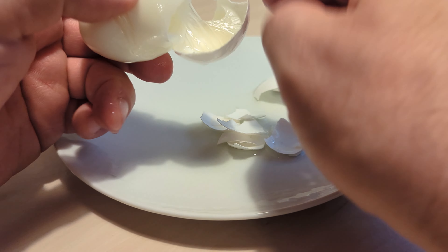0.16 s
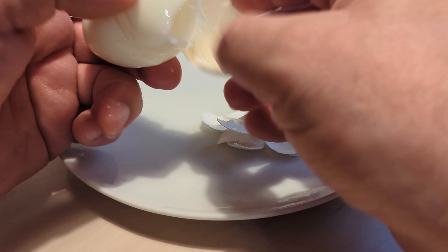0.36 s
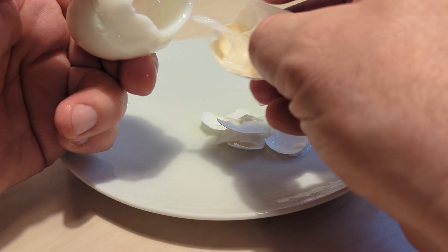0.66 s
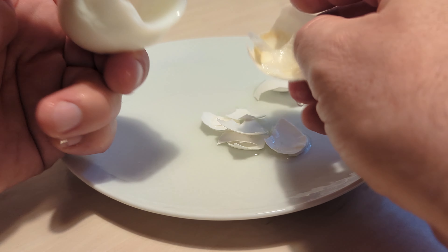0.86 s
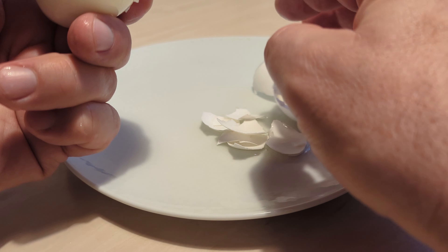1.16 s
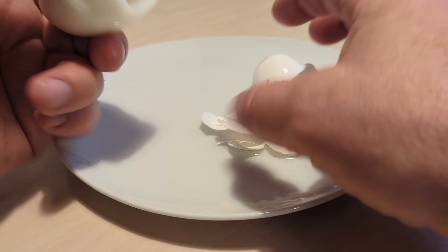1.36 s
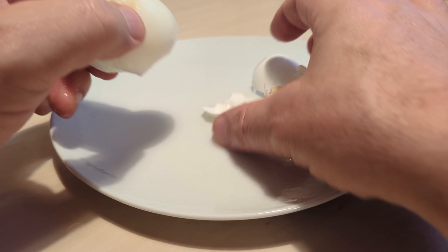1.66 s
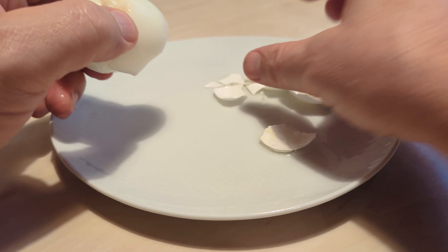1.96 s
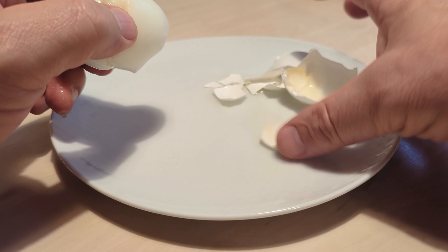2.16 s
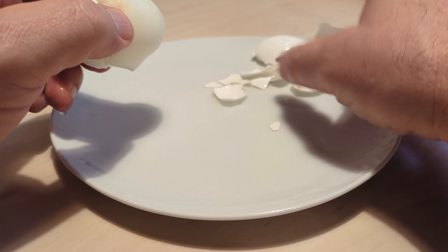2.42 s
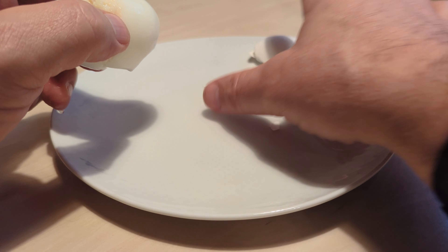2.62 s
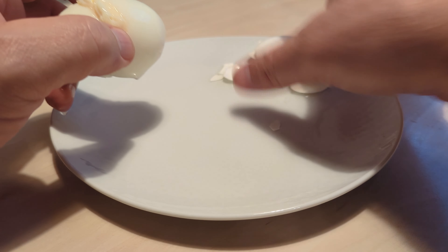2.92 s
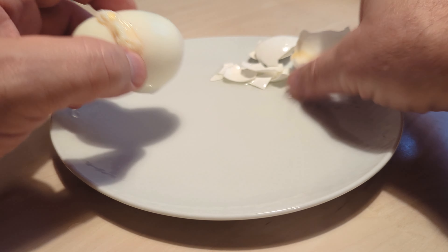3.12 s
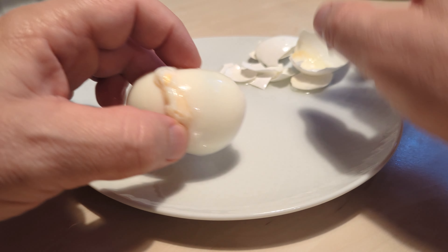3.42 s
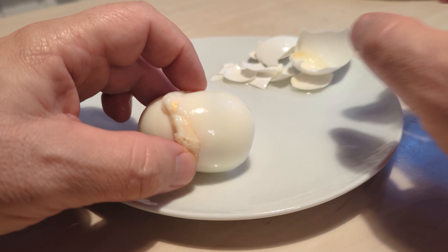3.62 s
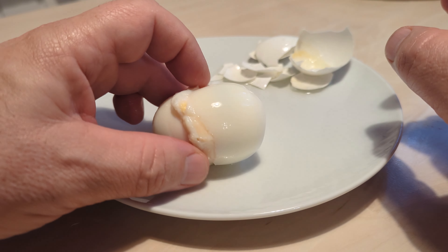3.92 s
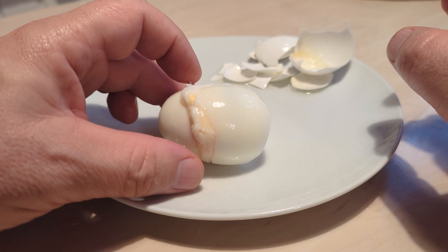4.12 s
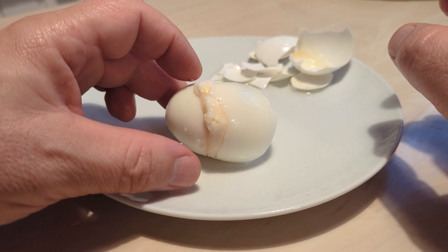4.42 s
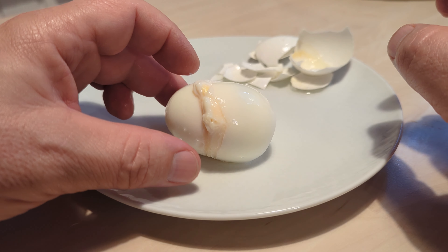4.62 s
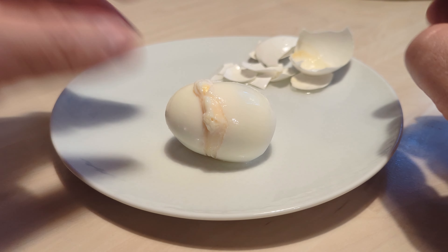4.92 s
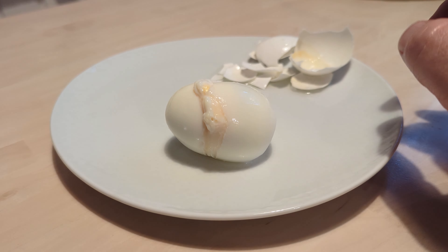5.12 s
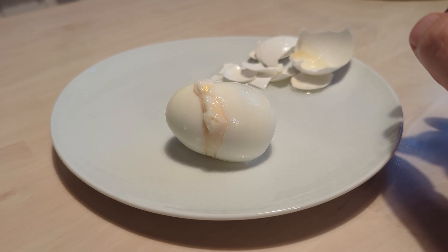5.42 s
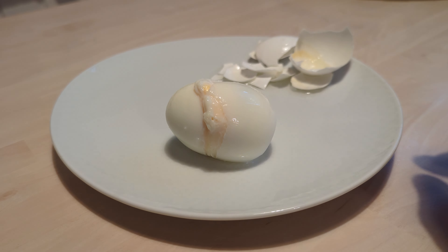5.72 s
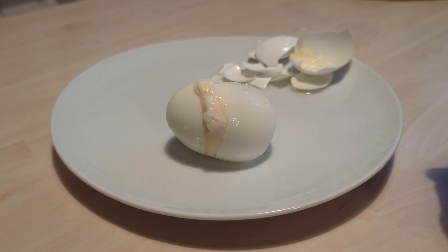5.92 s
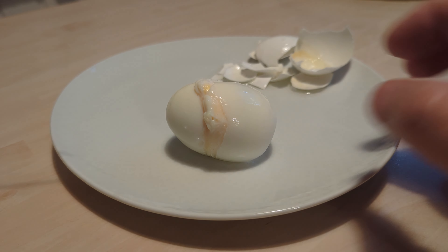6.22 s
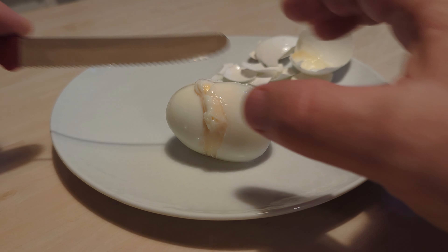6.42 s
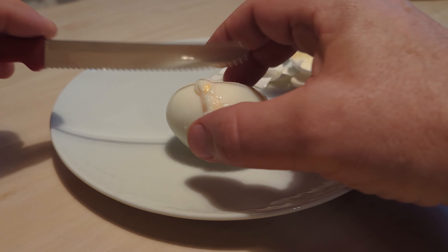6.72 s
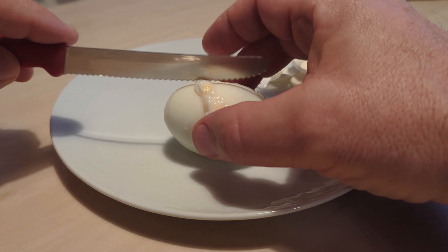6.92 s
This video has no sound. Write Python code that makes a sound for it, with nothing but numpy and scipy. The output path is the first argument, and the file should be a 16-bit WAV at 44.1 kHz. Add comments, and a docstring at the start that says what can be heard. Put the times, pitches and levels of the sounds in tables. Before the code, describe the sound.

Close, bright taps and brief scrapes of eggshell on a plate in a quiet kitchen, later one hard knock on wood over soft hiss.

```python
"""Eggshell pieces tap and slide on a porcelain plate: bursts of noise and clicks strike its damped modes.
Hands bump a wooden table as soft pushes on its low modes; a knife and knuckles knock on it as harder blows.
A clock case ticks about once a second. Hiss and rumble swell and sink, and the plate murmurs along faintly.
The near sounds excite a diffuse kitchen tail. Two spaced microphones hear every mode with a phase of its own."""
import sys
import numpy as np
from scipy import signal
from scipy.fft import rfft, irfft
from scipy.io import wavfile

SR = 44100
rng = np.random.default_rng(int(sys.argv[2]) if len(sys.argv) > 2 else 0)


def boost_factor(decibels):
    """Convert a level in decibels to a linear amplitude factor."""
    exponent = np.asarray(decibels, float) / 20
    return 10 ** exponent


def int16_out(signal):
    """Quantize to a 16-bit WAV file."""
    q = np.round(np.clip(np.atleast_2d(signal).T, -1, 1) * 32767)
    wavfile.write(sys.argv[1], SR, q.astype(np.int16))


N = 311506

# Free modes of the porcelain plate: mode_hz, level_db, t60_s, left_leads_by_rad
PLATE_MODES = [(541, 12, 0.062, -1.1), (894, 5, 0.13, -0.64), (1019, -3, 0.052, -1.6),
               (1793, -4, .35, -1.5), (1868, -4, .35, -1.5), (1925, -3, .16, -1.5), (2866, 1, .3, -1),
               (3016, -1, .26, -1.5), (3150, -3, .055, -1.5), (4000, -10.5, 0.22, 1.3),
               (4500, -15.5, 0.16, -1.4), (6300, -1, 0.13, -0.73)]
# Free modes of the wooden table: mode_hz, level_db, t60_s, left_leads_by_rad
TABLE_MODES = [(60, 3, .11, .4), (102, -9, .15, .3), (130, -5, .24, .3), (200, -9, .12, .3),
               (250, -7, .32, .5), (320, -7, .26, .7), (420, -7, .08, 1.2), (678, -7, .14, 2.9),
               (800, -8, .12, 2.9), (1205, -6, .18, 2.3), (1766, -5, .15, 1.5), (2100, -6, .12, .5),
               (2480, -6, .13, 1), (3015, -9, .07, 1.5)]
USUAL_HISS_DB = -65   # hiss level at which its treble and the plate's murmur are at their usual strength


def in_time(rows):
    """Linear interpolation: the columns of a curve over time at every sample."""
    s, *columns = np.transpose(rows)
    return [np.interp(np.arange(N) / SR, s, column) for column in columns]


def rms_one(x):
    """Normalization of mean power: scale to unit rms."""
    return x / np.sqrt(np.mean(x ** 2) + 1e-30)


def coloured(x, spectrum):
    """Spectral shaping: weight white input by a (Hz, dB) curve, linear over log frequency; rms 1."""
    hz = np.maximum(np.fft.rfftfreq(N, 1 / SR), 1)
    points = np.array(spectrum)
    gain_db = np.interp(np.log(hz), np.log(points[:, 0]), points[:, 1])
    return rms_one(irfft(rfft(x) * boost_factor(gain_db), N))


def drift(rate_hz):
    """Slow random modulation: lines between normal knots of spread 1, rate_hz knots a second."""
    knots = rng.standard_normal(400)
    return np.interp(np.arange(N) / SR * rate_hz, np.arange(400), knots)


def contact(hz, t60, width, click, rise_s):
    """Impact excitation: a short rise, a click at its top and a dying rattle, band-passed; peak 1."""
    snap_db, snap_s = 13, .002   # the first instants stand out above the rattle
    t = np.arange(8192) / SR
    decay = boost_factor(-60 * t / max(t60, .002))
    burst = rng.standard_normal(8192) * decay * np.minimum(t / rise_s, 1) ** 2
    burst = burst * boost_factor(snap_db * np.exp(-np.maximum(t - rise_s, 0) / snap_s))
    burst[int(rise_s * SR)] += click
    band = np.clip([hz / width, hz * width], 20, .44 * SR)
    burst = signal.sosfilt(signal.butter(3, band, "band", fs=SR, output="sos"), burst)
    return burst / np.abs(burst).max()


def add(track, s, sound):
    """Superposition: mix a sound into a track at time s."""
    i = int(round(s * SR))
    track[..., i:i + sound.shape[-1]] += sound[..., :N - i]


def ring(modes, force, damping=1):
    """Modal synthesis: force(k) drives damped resonator k; damping divides its t60; phase differs by ear."""
    out = 0
    for k, (hz, db, t60, phase) in enumerate(modes):
        pole = boost_factor(-60 * damping / (t60 * SR)) * np.exp(2j * np.pi * hz / SR)
        swing = signal.lfilter([boost_factor(db)], [1, -pole], force(k) + 1e-18)
        turn = np.exp(.5j * phase * np.array([[1], [-1]]))   # left, right
        out = out + np.imag(swing * turn)
    return out


def blows(rows, modes, lag_s, width, push_width, click, ping_db, rise_s, damping=1):
    """Impact and modal response: each contact is heard directly and strikes the modes unevenly.
    Rows: peak_s, level_db, contact_hz, t60_s, force_re_contact_db, crack_re_contact_db."""
    strike_spread_db, first_touch = 2, 40   # spread over modes; the first touch carries most of the force
    strengths = boost_factor(strike_spread_db * rng.standard_normal((len(rows), len(modes))))
    direct, forces = np.zeros((2, N)), np.zeros((len(modes), N))
    for (s, db, hz, t60, force_db, crack_db), strength in zip(rows, strengths):
        body = contact(hz, t60, width, click, rise_s)
        crack = contact(8200, t60, 3.7, 0.63, rise_s)
        ping = contact(hz, t60, 1.06, 15.0, rise_s)   # the short ping of the piece itself
        hit = body + boost_factor(crack_db) * crack + boost_factor(ping_db) * ping
        add(direct, s - rise_s, boost_factor(db) * hit)
        push = contact(hz, t60 / 4, push_width, first_touch, rise_s)
        add(forces, s - rise_s, push * boost_factor(db + force_db) * strength[:, None])
    later_ear = 0 if lag_s > 0 else 1   # a positive lag delays the left ear
    direct[later_ear] = np.roll(direct[later_ear], int(round(abs(lag_s) * SR)))
    return direct + ring(modes, lambda k: forces[k], damping)


def background(hiss_db, rumble_db):
    """Interaural coherence: hiss differs by ear and brightens as it swells; lumpy rumble is mostly shared."""
    # Hiss colour before brightening: band_hz, level_db
    hiss_colour = [(210, -51), (350, -9.5), (512, -10.5), (650, -10.5), (1080, -9), (1190, -4),
                   (1410, -7.5), (2100, -4), (5800, -12.5), (6480, -8.5), (7840, -15), (14300, -27.5),
                   (15500, -11)]
    # Rumble colour before its low cut: band_hz, level_db
    rumble_colour = [(18, -28), (30, -10.5), (51, 10), (72, -8.5), (134, -4), (274, -11), (400, -16.5),
                     (520, -26.5), (880, -120)]
    brightening, shared_power = .6, 0.78   # treble dB per dB of hiss; fraction
    hiss = coloured(rng.standard_normal((2, N)), hiss_colour)
    treble = signal.sosfilt(signal.butter(4, 7200, "high", fs=SR, output="sos"), hiss)
    hiss = hiss + treble * (boost_factor(brightening * (hiss_db - USUAL_HISS_DB)) - 1)
    shared, own = rng.standard_normal(N), rng.standard_normal((2, N))
    mixed = np.sqrt(shared_power) * shared + np.sqrt(1 - shared_power) * own
    rumble = coloured(mixed, rumble_colour)
    rumble = signal.sosfilt(signal.butter(8, 38, "high", fs=SR, output="sos"), rumble)
    return boost_factor(hiss_db) * hiss + boost_factor(rumble_db + 2.5 * drift(9)) * rumble


def murmur(hiss_db):
    """Sympathetic resonance: two plate modes hum faintly under noise whose level follows the hiss."""
    usual_force_db, force_db_per_hiss_db = -110, 2.2
    force_db = usual_force_db + force_db_per_hiss_db * (hiss_db - USUAL_HISS_DB) + 3.1 * drift(13)
    force = rng.standard_normal(N) * boost_factor(force_db)
    return ring(PLATE_MODES[4:6], lambda k: force, damping=0.87)


def clock():
    """Impulse response of a resonant case: each dull tick is a contact that rings two modes."""
    # Force of successive dull ticks, some stronger and the last ones fainter: force_db
    tick_force = [-94, -83.5, -87, -87, -95, -100, -102]
    # Modes of the clock case: mode_hz, level_db, t60_s, left_leads_by_rad
    case_modes = [(1080, 0, .06, .8), (1170, 0, .05, 4.15)]
    first_s, period_s = .434, 1.002
    force = np.zeros(N)
    for beat, db in enumerate(tick_force):
        add(force, first_s + period_s * beat, boost_factor(db) * contact(1210, 0.31, 1.256, 0.82, 0.00705))
    return ring(case_modes, lambda k: force)


def taps():
    """Impact on a damped plate: harder taps of shell rattle less long; a pushing hand shortens the ring."""
    # Shell on porcelain: peak_s, level_db, contact_hz, force_re_contact_db, crack_re_contact_db
    shell_taps = [(1.127, -37.5, 750, -49.5, 8), (1.136, -38, 1020, -47, -24),
                  (1.222, -16.5, 2760, -36.5, -11), (1.24, -26.5, 1013, -51.5, -9),
                  (1.625, -62.5, 817, -29.5, 14), (1.709, -41, 6300, -18, -24),
                  (1.806, -27.5, 5760, -51, -16), (1.815, -37, 5300, -18.5, -30),
                  (1.884, -40, 2920, -36, -2), (1.915, -45.5, 960, -67, -20), (1.934, -34.5, 3160, -36, 0),
                  (1.995, -44, 3180, -33, -22), (1.999, -47, 2000, -28, -22),
                  (2.139, -41, 4400, -31.5, -22), (2.168, -44, 3200, -38, -17), (2.306, -47, 3240, -26, 7),
                  (2.412, -22.5, 6920, -35, -20), (2.443, -32.5, 3300, -36, -18),
                  (2.457, -45, 1910, -29, -20), (2.484, -31.5, 3170, -32, -19),
                  (2.509, -32.5, 1825, -34.5, -24), (2.55, -32, 4000, -52, -26),
                  (2.555, -35, 1960, -56, -20), (2.878, -34.5, 3000, -36, -4.5),
                  (2.898, -60, 5800, -40, -17), (3.263, -28, 3570, -39.5, -20), (3.281, -43, 920, -42, -20),
                  (3.298, -41, 4300, -31, -30), (3.337, -49, 5160, -25, -17),
                  (3.696, -44.5, 3070, -35, -24)]
    rattle_t60_s, rattle_at_db = 0.043, -32.5   # rattle length of a tap at this level
    shortening = 0.34   # dB of length lost per dB of level
    hand_in_s, hand_damping = 1.5, 2.4   # from here a hand pushes the pieces
    free, held = [], []
    for s, db, hz, force_db, crack_db in shell_taps:
        t60 = rattle_t60_s * boost_factor(shortening * (rattle_at_db - db))
        part = free if s < hand_in_s else held
        part.append((s, db, hz, t60, force_db, crack_db))
    return sum(blows(part, PLATE_MODES, lag_s=.00016, width=3.24, push_width=1.446, click=11.0,
                     ping_db=-11, rise_s=.0025, damping=damping)
               for part, damping in [(free, 1), (held, hand_damping)])


def bumps():
    """Low-frequency forcing: a soft push, sinking in pitch as the weight settles, moves low table modes."""
    # Soft hands, fingers first and the weight after them: push_s, force_db, settled_hz,
    # damping (ratio, by the hand that stays; below 1 counts as 1)
    hand_pushes = [(1.129, -78, 210, 1.2), (1.145, -89, 132, 0.94), (1.229, -76.5, 205, 1),
                   (1.488, -98, 137, 1.8), (2.198, -85.5, 57, 0.9), (2.276, -81, 297, 1.7),
                   (2.465, -100.5, 63, 1.5), (2.594, -73.5, 224, 4.7), (2.605, -75, 74.7, 0.96),
                   (3.317, -88, 193, 0.81), (3.374, -89, 138, 0.86), (3.646, -103, 124, 2.5),
                   (4.533, -87.5, 347, 4.2), (5.589, -75, 294, 1.03), (5.595, -72.5, 102, 0.81),
                   (5.722, -79.5, 307, 1.6), (5.869, -66.5, 343, 0.68), (5.87, -89.5, 62, 1)]
    sag_hz, sag_cycles = 60, .65   # extra pitch at the start; cycles of settled pitch until the force peaks
    out, t = np.zeros((2, N)), np.arange(16384) / SR
    for s, db, hz, damping in hand_pushes:
        age = t * hz / sag_cycles
        cycles = np.cumsum(hz + sag_hz * np.exp(-age)) / SR + rng.random()
        force = boost_factor(db) * age * np.exp(1 - age) * np.sin(2 * np.pi * cycles)
        lowest = ring(TABLE_MODES[:3], lambda k: force)   # the hand leaves these undamped
        upper = ring(TABLE_MODES[3:7], lambda k: force, max(damping, 1))
        add(out, s - .004, lowest + upper)
    return out


def slides():
    """Stick-slip friction: shell edges catch on the glaze as a grainy hiss, and the plate hums along."""
    # Strokes of shell across the glaze: start_s, length_s, hiss_db, drag_force_db
    strokes = [(1.71, 0.086, -63, -120), (1.858, 0.1, -58, -113), (2.006, 0.3, -63, -112),
               (2.426, 0.013, -43, -100), (2.471, 0.029, -61, -90.5), (2.548, 0.0042, -63, -88),
               (3.283, 0.078, -70, -101)]
    # Colour of the grains: band_hz, level_db
    shell_colour = [(1500, -50), (3300, -6), (6500, -8), (11000, -10), (16000, -7)]
    rise_db_per_s, fall_db_per_s, catches_per_s = 802, 520, 500
    t, hiss, hum = np.arange(N) / SR, np.zeros(N), np.zeros(N)
    for s, length, hiss_db, drag_db in strokes:
        rise_db, fall_db = rise_db_per_s * (t - s), fall_db_per_s * (s + length - t)
        shape_db = np.minimum(0, np.minimum(rise_db, fall_db))
        hiss = hiss + boost_factor(hiss_db + shape_db)
        hum = hum + boost_factor(drag_db + shape_db)
    sizes = boost_factor(4 * np.minimum(rng.exponential(1, (2, N)), 4)) * rng.choice([-1, 1], (2, N))
    catches = (rng.random((2, N)) < catches_per_s / SR) * sizes
    grains = coloured(catches + 0.032 * np.roll(catches[1], 7), shell_colour)
    # the drag is soft: it reaches the lower modes, and the pieces lying on the plate damp them
    drag = signal.sosfilt(signal.butter(2, [600, 2200], "band", fs=SR, output="sos"), catches[1])
    force = rms_one(drag) * hum * boost_factor(2.1 * drift(45))
    scrape = hiss * grains * boost_factor(0.21 * drift(24.6))
    return scrape + ring(PLATE_MODES[:8], lambda k: force, damping=3.33)


def knocks():
    """Contact stiffness: harder, brighter contacts of knife and knuckles drive the table more."""
    # Blows on the table: peak_s, level_db, contact_hz, rattle_t60_s, crack_re_contact_db
    table_blows = [(2.273, -34.5, 1104, 0.068, -15), (5.589, -45.5, 1500, 0.03, 1.5),
                   (5.655, -35, 825, 0.071, -18), (5.665, -35.5, 1585, 0.055, -11),
                   (5.7212, -39.5, 1670, 0.055, 0), (5.7552, -45, 2670, 0.04, 10),
                   (5.777, -34, 6320, 0.028, -23), (5.8667, -13, 2550, 0.004, -9),
                   (5.8695, -14.5, 2300, 0.014, -30), (5.875, -26, 1050, 0.09, -30),
                   (6.122, -44.5, 1880, 0.12, -0.5), (6.129, -37, 2640, 0.31, -2.5)]
    force_at_1khz_db, force_db_per_octave = -39.5, 3.5   # relative to the contact
    grip_until_s, grip_damping = 5.8, 2.2   # until then a hand lies on the table and shortens its ring
    held, free = [], []
    for s, db, hz, t60, crack_db in table_blows:
        force_db = force_at_1khz_db + force_db_per_octave * np.log2(hz / 1000)
        part = held if s < grip_until_s else free
        part.append((s, db, hz, t60, force_db, crack_db))
    return sum(blows(part, TABLE_MODES, lag_s=-.00036, width=1.55, push_width=1.6, click=6,
                     ping_db=-9, rise_s=.0022, damping=damping)
               for part, damping in [(held, grip_damping), (free, 1)])


def kitchen(x):
    """Diffuse reverberation: octave noise bands decay at their own rate; long waves reach both ears alike."""
    # Reverberation of the kitchen: band_hz, t60_s
    decay_times = [(200, 0.59), (2000, 0.087), (12000, 0.26)]
    t, points, tail = np.arange(24000) / SR, np.array(decay_times), 0
    for hz in 90 * 2 ** np.arange(8):
        band = signal.butter(1, [hz / np.sqrt(2), hz * np.sqrt(2)], "band", fs=SR, output="sos")
        t60 = np.interp(np.log(hz), np.log(points[:, 0]), points[:, 1])
        mid, side = rng.standard_normal((2, len(t)))
        width = min(hz / 600, 1)
        noise = mid + width * side * [[1], [-1]]
        tail = tail + signal.sosfilt(band, noise) * boost_factor(-60 * t / t60)
    tail = tail * np.clip(t / 0.006, 0, 1)   # first reflections need a few ms
    tail = tail / np.sqrt(np.sum(tail ** 2) / 2)
    return signal.fftconvolve(x, tail, axes=1)[:, :N]


def scene():
    """Superposition of paths: near sounds ring in the kitchen; bumps arrive through the table itself."""
    # Swell of the background: time_s, hiss_db (before brightening), rumble_db (before its low cut)
    swell = [(0, -63, -65.5), (.4, -65, -67.5), (.85, -66, -72.5), (1.1, -65.5, -74.5), (1.45, -61, -64),
             (1.75, -59.5, -58.5), (2.1, -58, -64), (3.1, -60.5, -63.5), (3.35, -59, -53), (3.62, -60, -57),
             (3.8, -60.5, -66), (4.2, -65, -70.5), (4.7, -65, -68.5), (5.5, -61.5, -66), (5.8, -58.5, -55),
             (6.35, -63, -74), (6.52, -58, -68), (7.06, -62.5, -62.5)]
    hiss_db, rumble_db = in_time(swell)
    near = taps() + knocks() + slides() + clock()
    near = near + boost_factor(-1) * kitchen(near)
    # the left ear hears less of the highest treble of the near sounds
    shade = signal.butter(2, 12900, fs=SR, output="sos")
    near = np.stack([signal.sosfilt(shade, near[0]), near[1]])
    return near + bumps() + murmur(hiss_db) + background(hiss_db, rumble_db)


def low_pass(x):
    """Removes everything above the highest recorded frequency."""
    return signal.sosfilt(signal.butter(12, 16500, fs=SR, output="sos"), x)


def record(dry):
    """Filtering: a narrow treble dip near 10 kHz; bottom and top are cut."""
    dip_hz, dip_width_hz, dip_depth = 9850, 500, .8   # depth: fraction removed at the centre
    b, a = signal.iirpeak(dip_hz, dip_hz / dip_width_hz, SR)
    heard = dry - dip_depth * signal.lfilter(b, a, dry)
    heard = signal.sosfilt(signal.cheby1(10, 1, 15500, fs=SR, output="sos"), heard)
    heard = signal.sosfilt(signal.butter(3, 54.4, "high", fs=SR, output="sos"), heard)
    return low_pass(heard)


dry = scene()
out = record(dry)
int16_out(out)
```